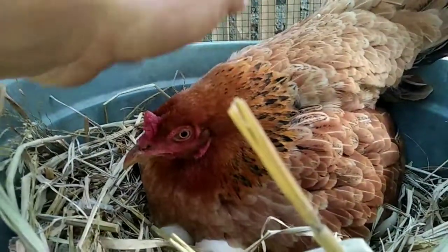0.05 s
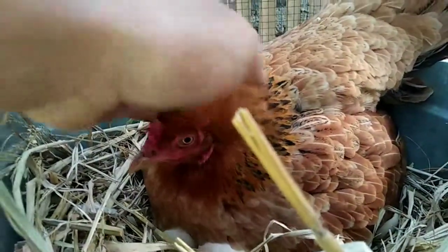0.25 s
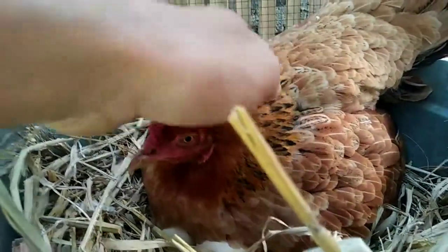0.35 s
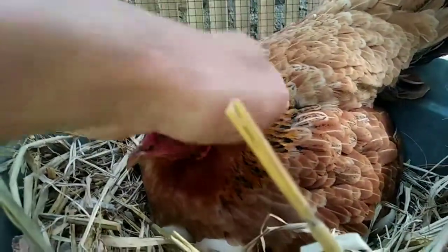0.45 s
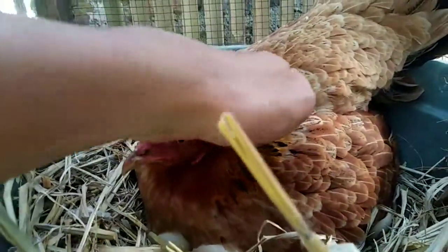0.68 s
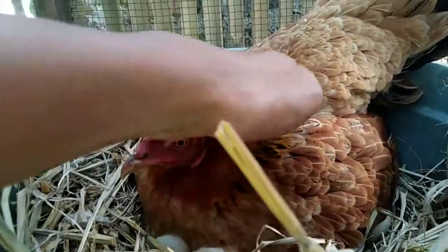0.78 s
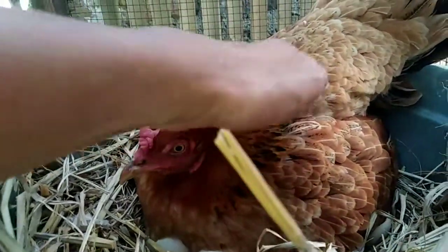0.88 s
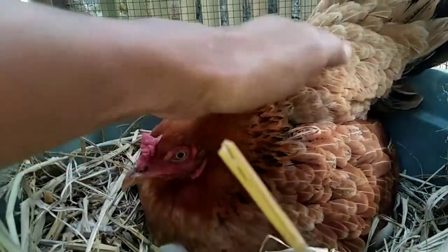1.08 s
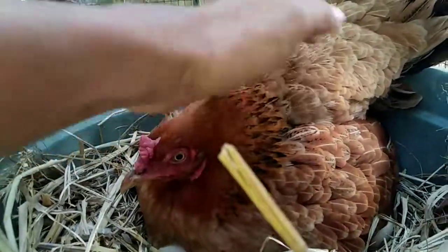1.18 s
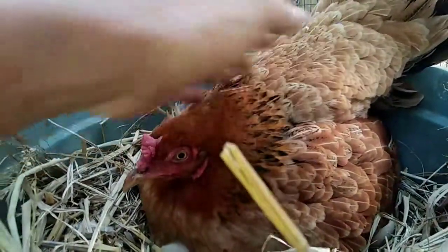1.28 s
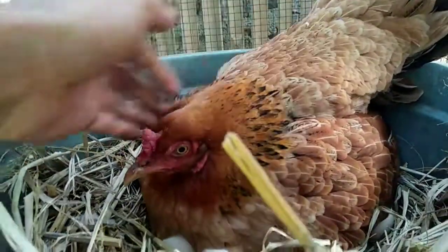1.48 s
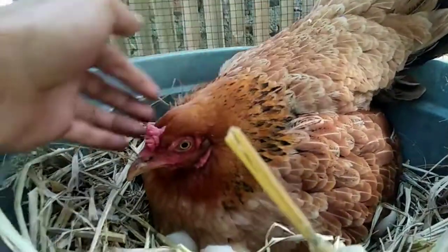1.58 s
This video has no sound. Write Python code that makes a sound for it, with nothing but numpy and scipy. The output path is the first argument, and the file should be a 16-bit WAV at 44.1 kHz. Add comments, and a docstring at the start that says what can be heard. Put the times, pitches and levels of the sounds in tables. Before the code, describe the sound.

A hen gives one low, harsh, throbbing growl over faint microphone handling rumble.

```python
"""A broody hen growls once in her straw nest as a hand strokes her, close to a hand-held microphone.
A membrane in her throat buzzes, rough air rings her windpipe and hisses in her beak, and the whole
voice throbs some 55 times a second. The grip on the microphone adds low hums and thumps.
Straw and feathers rustle, and behind it all lies yard hiss with a faint drone and whine."""
import sys
import numpy as np
from scipy import signal
from scipy.fft import rfft, irfft, next_fast_len
from scipy.io import wavfile
from scipy.ndimage import uniform_filter1d

SR = 44100
rng = np.random.default_rng(int(sys.argv[2]) if len(sys.argv) > 2 else 0)


def to_wav(sig):
    """Store sig (one row per channel, or 1-D mono) as 16-bit WAV at the path in sys.argv[1].

    Samples outside -1..1 are clipped; the rate is SR.
    """
    pcm = np.clip(np.atleast_2d(sig), -1, 1) * 32767
    pcm = np.round(pcm).astype(np.int16)
    wavfile.write(sys.argv[1], SR, pcm.T)  # frames by channels


N = 72765
T = np.arange(N) / SR

# The course of the growl: t/s, lowest tone/dB, overtones/dB, hiss/dB, throb depth/dB, roughness/0-1
GROWL = [(.405, -67, -44, -102, 20.5, 0.2), (0.415, -35.5, -47, -65, 15, 0.03),
         (0.436, -43.5, -43.5, -71, 10, 0.3), (.45, -51, -55, -65, 13, 0.3),
         (0.472, -55, -35.5, -78, -1.5, 0.8), (0.481, -37, -37.5, -69, 13, 0),
         (0.501, -26.5, -30, -64, 11.5, 0), (.515, -39, -31, -64, -3.5, 0.77),
         (0.55, -45, -30, -79.5, 10.5, 0.7), (0.559, -27.5, -28, -71, 7, 0.4),
         (.58, -27.5, -27, -57.5, 1, 0.25), (.615, -26.5, -28, -54.5, 3, 0.3),
         (.637, -34.5, -27.5, -56, 10, 0.8), (.665, -25, -28.5, -56, 4, 0.15),
         (.7, -26.5, -30.5, -55, 1, 0.2), (0.734, -27, -31, -57.5, 6, 0.22),
         (.78, -25.5, -30, -61, 4, 0.22), (.84, -27, -29, -57, 5, 0.26), (0.878, -25, -28, -56.5, 6, 0.17),
         (.893, -30, -33.5, -59, 13, 0.2), (0.919, -33.5, -36, -61.5, 11.5, 0.15),
         (0.977, -41, -44.5, -69, 18, 0.15), (0.998, -29, -35, -83, 14.5, 0.2),
         (1.01, -50.5, -45.5, -85, 6, 0.2), (1.026, -43, -64, -93, 21.5, 0.2),
         (1.05, -52.5, -68, -95, -13.5, 0)]
# How fast the voice throbs: t/s, rate/Hz
THROB_RATE = [(.41, 60), (.5, 56), (.8, 55.6), (.85, 51.5), (1.04, 51.5)]
def growl():
    """The throat's voice and the beak's hiss swell and sink with one shared throb."""
    times, *columns = np.transpose(GROWL)
    low_db, high_db, hiss_db, depth_db, rough = (np.interp(T, times, c) for c in columns)
    gate = np.clip(np.minimum(T - times[0], times[-1] - T) * 200, 0, 1)  # 5 ms fades
    throb = 2 * np.pi * np.cumsum(over_time(THROB_RATE)) / SR
    throb -= throb[round(.418 * SR)]  # one throb peaks at this time
    uneven_db = 1.13 * wander(60)

    def swell(db, lead=0):
        """A slightly uneven rise and fall, about db deep and lead radians early."""
        squarish = np.tanh(2.2 * (np.cos(throb + lead) + .15))
        gain = gain_of(.5 * db * squarish + uneven_db)
        return gate * gain / np.sqrt(uniform_filter1d(gain ** 2, size=1600))

    hz = over_time(PITCH) * (1 + .088 * np.cos(throb + .15) + .027 * wander(200))  # bend and jitter
    cycles = np.cumsum(hz) / SR
    low = np.sqrt(2) * np.cos(2 * np.pi * cycles - 1.1 + .14 * wander(90))
    puffs = (.1 + np.exp(-(cycles % 1) / .56)) * rng.standard_normal((3, N))  # one puff of air a cycle
    high = throat(hz, cycles, puffs[0], high_db, rough)
    high_depth_db = depth_db * np.clip(depth_db / 15, .3, 1)  # overtones follow a weak throb less
    voice = low * swell(depth_db) * gain_of(low_db) + high * swell(high_depth_db, lead=.033)
    return voice + beak(puffs[1:], swell, depth_db, hiss_db)


# The note the throat buzzes at: t/s, f/Hz
PITCH = [(.41, 300), (.5, 292), (.58, 299), (.64, 297), (.72, 287), (.8, 299), (.86, 299), (.885, 282),
         (.905, 250), (.93, 234), (.97, 232), (1.0, 248), (1.04, 245)]
# How the throat colours the overtones: f/Hz, relative level/dB
THROAT_COLOUR = [(400, -16), (600, 1), (820, 5), (1150, 1), (1450, -8.5), (1750, -14), (2250, -16),
                 (2700, -44.5), (3300, -43.5)]
# Where the windpipe rings: f/Hz, width/Hz, relative level/dB
WINDPIPE_RINGS = [(381, 101, 2), (568, 157, -6), (803, 88, 3), (1128, 163, -2.5), (1470, 446, -13),
                  (2096, 436, -21)]
def throat(hz, cycles, puffs, level_db, rough):
    """Sharp membrane pulses mix with the rasp of air ringing the windpipe."""
    dulling = gain_of(np.clip(.17 * (-32 - level_db), 0, 4))  # the pulses get duller below -32 dB
    pulses = unit_rms(sum(
        gain_of(over_pitch(THROAT_COLOUR, k * hz * dulling)) * np.cos(2 * np.pi * k * cycles - .5)
        for k in range(2, 12)))
    rasp = ring(puffs, WINDPIPE_RINGS)
    return (np.sqrt(1 - rough) * pulses + np.sqrt(rough) * rasp) * gain_of(level_db)


# Where the beak rings: f/Hz, width/Hz, relative level/dB
BEAK_RINGS = [(1970, 260, 2), (2395, 250, -1.5), (3170, 490, -6.5), (4075, 350, -5), (6530, 1230, -7),
              (9100, 540, -20.5)]
# A sharp sizzle in the beak: t/s, level/dB
SIZZLE = [(.47, -87), (.503, -61.5), (.525, -67), (.57, -73.5), (.582, -55.5), (.63, -60), (.69, -66),
          (.75, -72), (.86, -64.5), (.89, -73), (.91, -92)]
def beak(puffs, swell, depth_db, hiss_db, alike=.5):
    """Air hisses in the beak and spits with each throb, partly alike on the left and right."""
    breath = swell(.3 * depth_db) * gain_of(hiss_db)
    spit = swell(db=9) * gain_of(over_time(SIZZLE))
    left, other = (ring(p, BEAK_RINGS) * breath + ring(p, [(5780, 510, 0)]) * spit for p in puffs)
    return np.array([left, alike * left + np.sqrt(1 - alike ** 2) * other])


# How much louder the hen is on the left: f/Hz, left minus right/dB
HEN_BALANCE = [(60, 0.5), (87, 0.5), (120, 0.5), (180, -1.0), (260, -1.5), (380, -1.0), (540, -2.5),
               (780, -3.0), (1130, -0.5), (1630, 5.0), (2350, 2.0), (3390, -7.0), (4890, -2.5),
               (7060, -0.5), (10200, 1.5), (14700, 1.5)]
# How far her wave is ahead on the left: f/Hz, lead/radians
HEN_PHASE = [(200, -.15), (350, -.25), (500, -.7), (780, -1.05), (1210, -.7), (1500, -1.0), (1890, -3.2),
             (2300, -1.2)]
def hen(ring_s=.025, ring_db=-17):
    """The growl reaches the microphone's two sides unequally, with a short ring of the nest tub."""
    size = next_fast_len(N + 4096)
    hz = np.fft.rfftfreq(size, 1 / SR)
    left = gain_of(.5 * over_pitch(HEN_BALANCE, hz)) * np.exp(.5j * over_pitch(HEN_PHASE, hz))
    direct = irfft(rfft(growl(), size) * np.array([left, 1 / left]), size)[:, :N]
    t = T[:6000]
    tail = rng.standard_normal((2, len(t))) * gain_of(-60 * t / ring_s) * (t > .002)
    tail /= np.linalg.norm(tail[0])
    return direct + gain_of(ring_db) * signal.fftconvolve(direct, tail, axes=1)[:, :N]


# Hums of the grip: t/s, length/s, level/dB, f/Hz
HUMS = [(.172, .13, -38, 85.3), (.75, .1, -36, 85.5), (.865, 0.019, -40.5, 89.5), (.95, 0.074, -42.5, 86),
        (1.025, 0.1, -42, 82.7)]
def hums(rise_share=.46, fall_share=.12):
    """The grip makes wavering low hums, with a little rubbing noise, that swell and stop short."""
    out = np.zeros(N)
    wobbly_time = np.cumsum(1 + .045 * wander(25)) / SR
    rub = ring(rng.standard_normal(N), [(179, 34, 0)])
    for start, length, db, hz in HUMS:
        progress = (T - start) / length
        ramp = np.clip(np.minimum(progress / rise_share, (1 - progress) / fall_share), 0, 1)
        phase = 2 * np.pi * hz * (wobbly_time - wobbly_time[round(start * SR)])
        tone = np.sin(phase) + gain_of(-18) * np.sin(2 * phase) + gain_of(-23) * rub
        out += np.sqrt(2) * gain_of(db) * np.sin(np.pi / 2 * ramp) * tone
    return out


# Thumps of the grip: t/s, level/dB, f/Hz
THUMPS = [(0.058, -52.5, 51.5), (.225, -51, 45), (0.296, -49, 45), (.352, -44.5, 61), (0.431, -49, 55),
          (0.664, -45, 55), (0.801, -44, 44.6), (0.843, -45, 45), (1.14, -47, 100), (1.218, -39.5, 89.6),
          (1.27, -51, 91), (1.39, -42, 86), (1.51, -46.5, 76)]
def thumps(cycles=1.54):
    """Each soft bump of the hand is a low wave only a cycle or two long."""
    out = np.zeros(N)
    for at, db, hz in THUMPS:
        shape = np.exp(-((T - at) * hz * 2 / cycles) ** 2)
        out -= gain_of(db) * shape * np.sin(2 * np.pi * hz * (T - at))
    return out


# How much louder the grip is on the left: t/s, left minus right/dB
GRIP_BALANCE = [(0, 0), (.9, 1.9), (1.1, 2.2), (1.3, 3.5)]
def grip():
    """The hand's hums and thumps drift from the middle to the left."""
    pan_db = .5 * over_time(GRIP_BALANCE)
    return (hums() + thumps()) * gain_of([pan_db, -pan_db])


# Rustles in the nest: middle t/s, length/s, level/dB, f/Hz, width/Hz
RUSTLES = [(0.126, 0.08, -62.5, 915, 1940), (.3, 0.023, -65, 1200, 149), (0.392, 0.026, -65.5, 1710, 400),
           (1.053, .06, -58, 367, 200), (1.17, 0.026, -57, 880, 410), (1.173, 0.055, -68.5, 4630, 2500),
           (1.317, 0.043, -66, 1560, 950), (1.324, .12, -66, 600, 398), (1.37, 0.025, -65, 1420, 520),
           (1.543, 0.045, -57, 356, 234), (1.548, 0.12, -66, 760, 194), (1.599, 0.078, -67, 1580, 700)]
def rustles(grain_db=2):
    """Straw and feathers give soft bursts of grainy noise."""
    out = np.zeros((2, N))
    for at, length, db, hz, width in RUSTLES:
        shape = gain_of(db) * np.exp(-(2 * (T - at) / length) ** 2)
        for side in range(2):
            grains = rng.standard_normal(N) * gain_of(grain_db * wander(80))
            out[side] += shape * unit_rms(resonate(resonate(grains, hz, width), hz, width))
    return out


# The colour of the yard's noise: f/Hz, relative level/dB
YARD_COLOUR = [(18, -30.5), (30, -18.5), (59, -3.5), (139, -1.5), (185, -9), (374, -17), (629, -17),
               (1140, -25), (2370, -26.5), (3320, -29.5), (3680, -32), (4780, -32.5), (8470, -33),
               (13900, -39.5), (15000, -49.5)]
# How alike its left and right are: f/Hz, likeness/-1 to 1
YARD_ALIKE = [(60, 0.41), (130, 0.97), (290, 0.83), (630, 0.29), (1390, -0.074), (3050, -0.34),
              (6700, 0.15), (14700, -0.24)]
# How much louder it is on the left: f/Hz, left minus right/dB
YARD_BALANCE = [(60, 3.0), (110, 3.5), (200, 2.5), (380, 0.5), (690, 2.0), (1270, 3.0), (2350, 1.5),
                (4330, -2.0), (7970, -2.5), (14700, 1.5)]
# How its bass rises and falls: t/s, bass boost/dB, bass cut/dB
YARD_BASS = [(0, -6, 0), (.3, -9.5, 1), (1.001, 2, 4.5), (1.299, 0.5, -2), (1.65, 1, 4.5)]
def yard_hiss(level_db=-59.5, patch_db=1.8, bass_hz=250):
    """Patchy hiss and a slowly changing rumble fill the yard."""
    frames, hz = N // 512 + 5, np.fft.rfftfreq(2048, 1 / SR)
    a, b, c, d, patches = rng.standard_normal((frames, 1025, 5)).T  # each is pitch by time
    patches = uniform_filter1d(patches, size=20, axis=0)
    patches = unit_rms(uniform_filter1d(patches, size=5, axis=1))
    alike = over_pitch(YARD_ALIKE, hz)[:, None]
    left, other = a + 1j * b, c + 1j * d
    spectrum = np.array([left, alike * left + np.sqrt(1 - alike ** 2) * other])
    spectrum *= gain_of(over_pitch(YARD_COLOUR, hz)[:, None] + patch_db * patches)
    spectrum *= gain_of(np.multiply.outer([.5, -.5], over_pitch(YARD_BALANCE, hz)))[..., None]
    times, boost_db, cut_db = np.transpose(YARD_BASS)
    t = (np.arange(frames) - 1) * 512 / SR
    bass_share = 1 / (1 + (hz[:, None] / bass_hz) ** 2)
    spectrum *= gain_of(bass_share * np.interp(t, times, boost_db - cut_db))
    noise = signal.istft(spectrum, nperseg=2048, noverlap=1536)[1][:, :N]
    return gain_of(level_db) * unit_rms(noise)


# How the whine fades and partly returns: t/s, level change/dB
WHINE_FADE = [(0, 5), (.35, -8), (0.599, -7.5), (1.65, -4)]
def whine(hz=2428, base_db=-80.5):
    """A very narrow band of noise makes a thin, distant whine."""
    return gain_of(base_db + over_time(WHINE_FADE)) * ring(rng.standard_normal(N), [(hz, 12, 0)])


def drone(hz=138, level_db=-63.5):
    """A distant low tone wavers gently in loudness."""
    return np.sqrt(2) * gain_of(level_db + .83 * wander(2.7)) * np.sin(2 * np.pi * hz * T)


def gain_of(db):
    """Turn decibels into a multiplier."""
    return 10 ** (np.asarray(db) / 20)


def unit_rms(x):
    """Scale a signal to an average strength (rms) of 1."""
    return x / np.sqrt(np.mean(x ** 2) + 1e-20)


def over_time(points):
    """Join (time, value) points with straight lines."""
    return np.interp(T, *np.transpose(points))


def over_pitch(points, hz):
    """Look up hz between (frequency, value) points on a log scale."""
    f, value = np.transpose(points)
    return np.interp(np.log(hz + 1), np.log(f + 1), value)


def wander(hz):
    """A smooth random wobble, mostly slower than hz."""
    smooth = signal.butter(2, hz, fs=SR, output="sos")
    return unit_rms(signal.sosfiltfilt(smooth, rng.standard_normal(N)))


def resonate(x, hz, width):
    """Let through the band around hz."""
    turn, decay = np.exp(2j * np.pi * hz * T), np.exp(-np.pi * width / SR)
    return 2 * (turn * signal.lfilter([1 - decay], [1, -decay], x / turn)).real


def ring(x, peaks):
    """Ring steep resonances (f/Hz, width/Hz, level/dB) side by side; the result has rms 1."""
    return unit_rms(sum((-1) ** k * gain_of(db) * resonate(resonate(x, hz, 1.5 * width), hz, 1.34 * width)
                        for k, (hz, width, db) in enumerate(peaks)))


def scene():
    """The hen in front, small noises around her and the yard behind."""
    return hen() + grip() + rustles() + yard_hiss() + whine() + drone()


def record(dry):
    """Cut the treble above 15 kHz."""
    lowpass = signal.firwin(511, 15000, window=("kaiser", 9), fs=SR)
    return signal.oaconvolve(dry, lowpass[None], "same")


dry = scene()
out = record(dry)
to_wav(out)
```